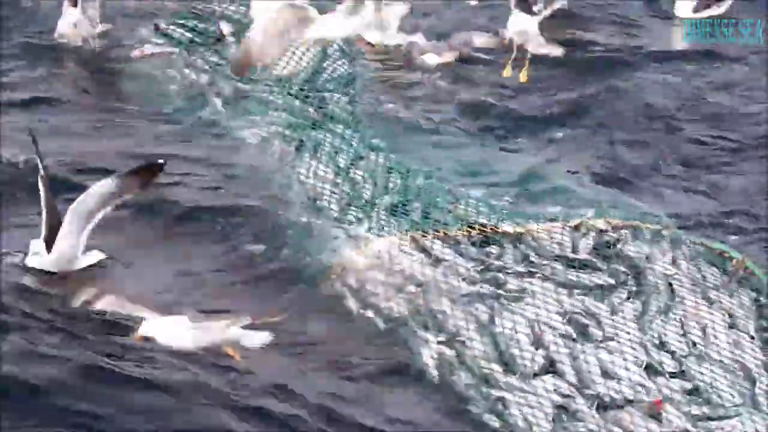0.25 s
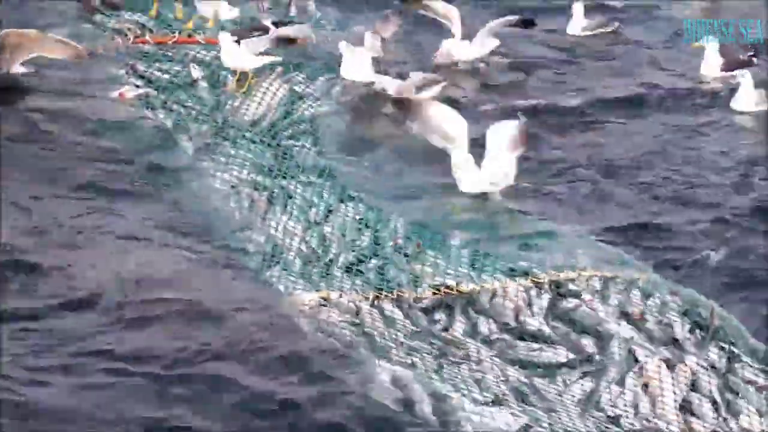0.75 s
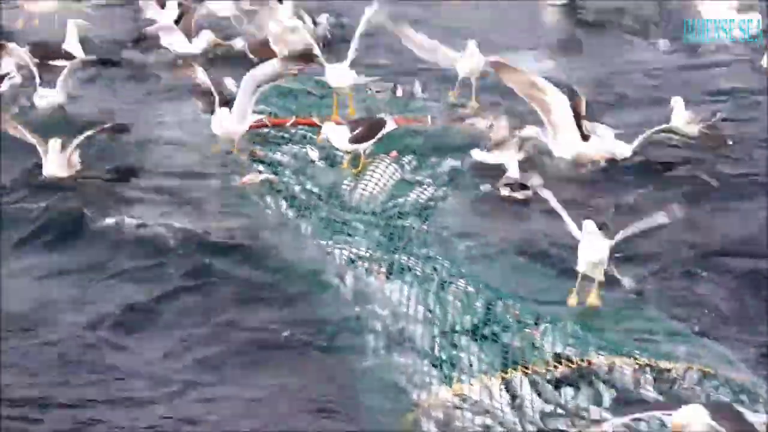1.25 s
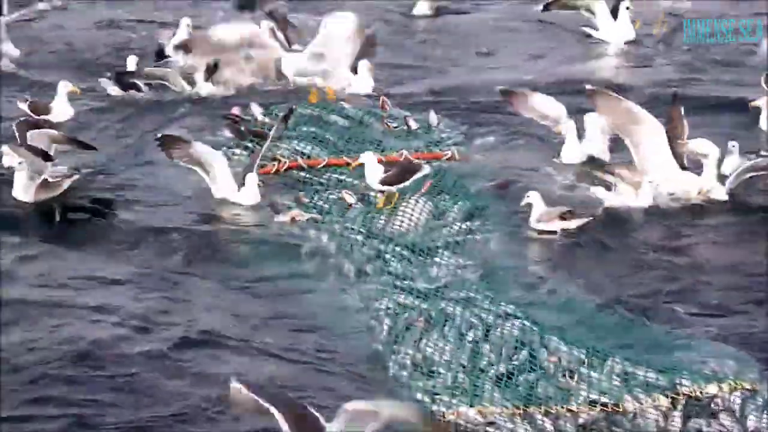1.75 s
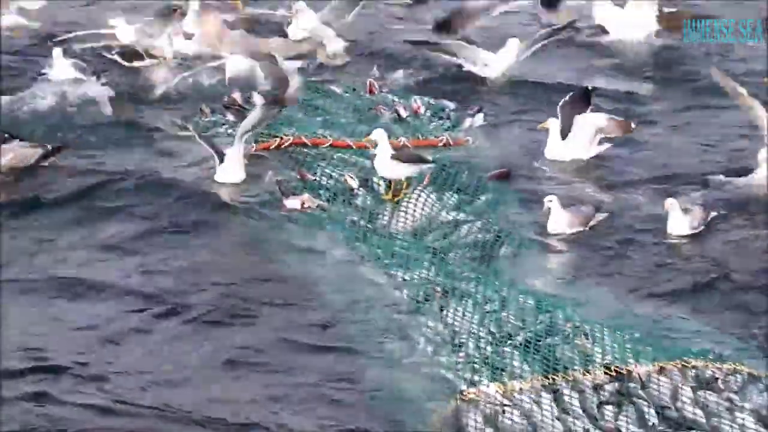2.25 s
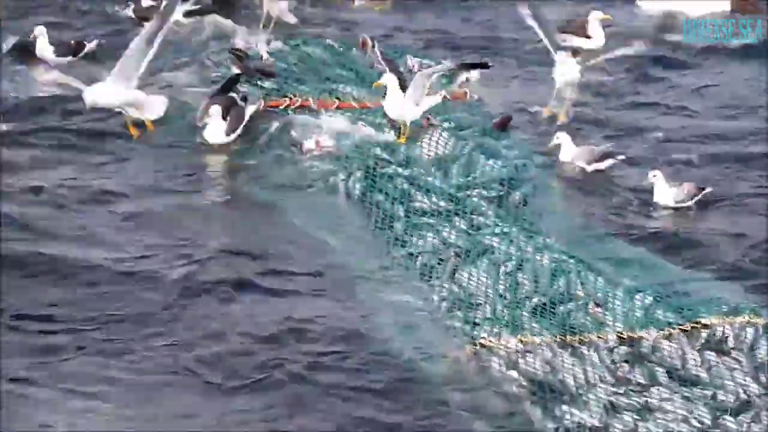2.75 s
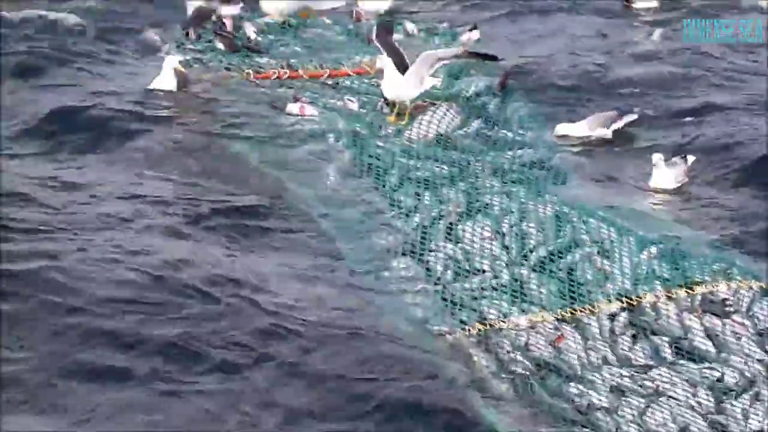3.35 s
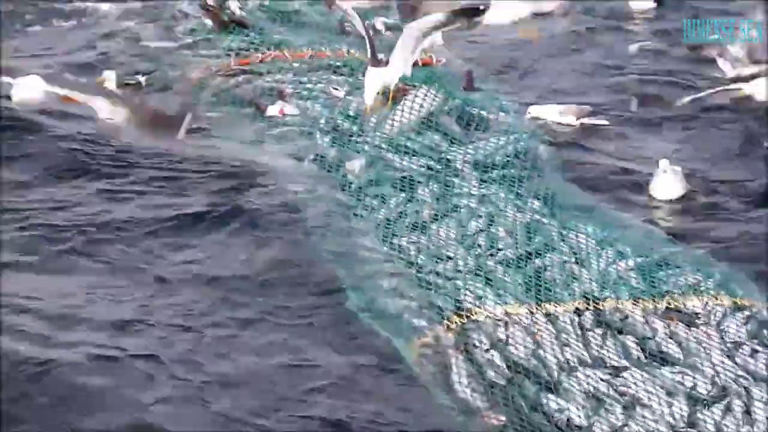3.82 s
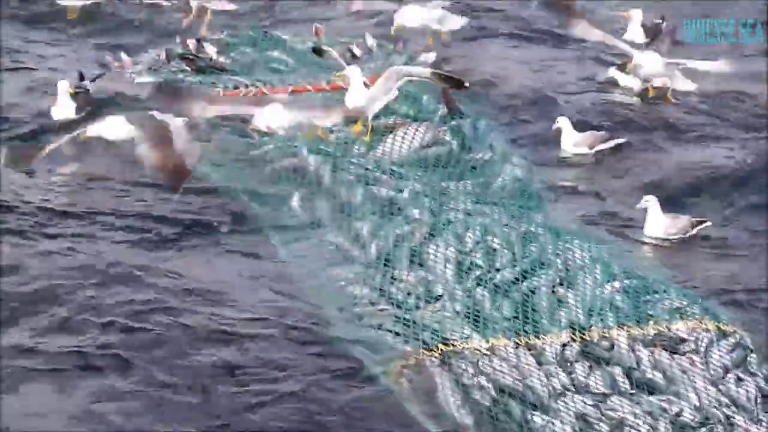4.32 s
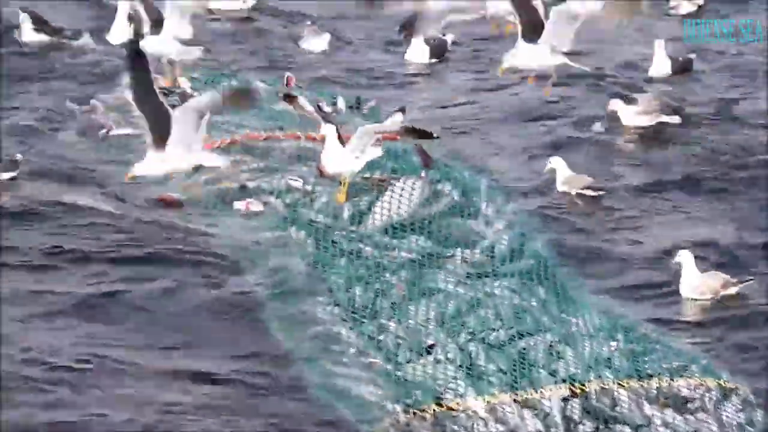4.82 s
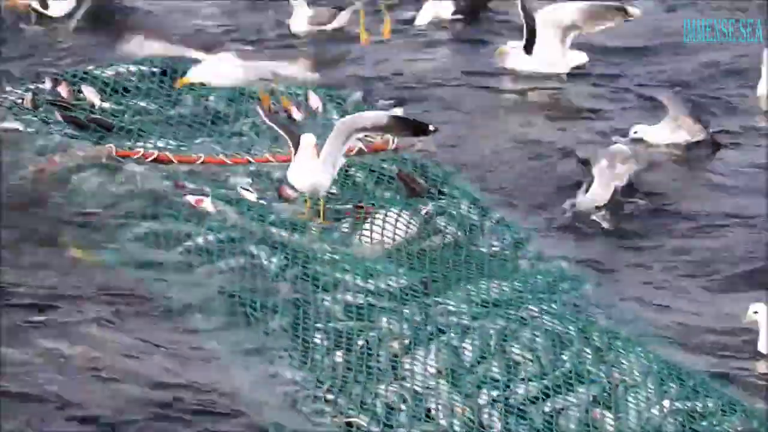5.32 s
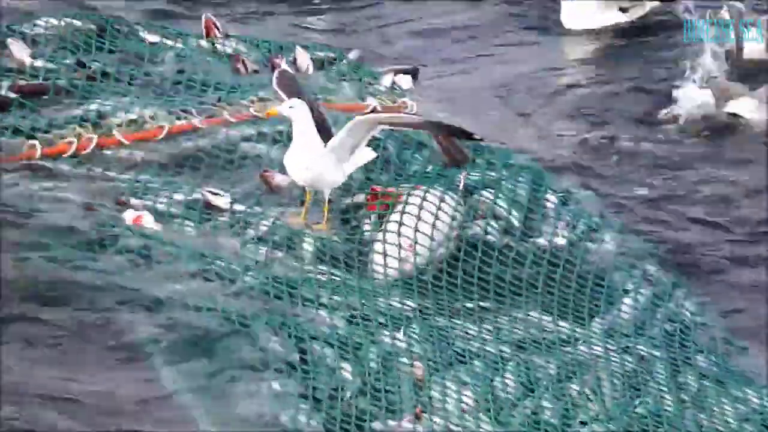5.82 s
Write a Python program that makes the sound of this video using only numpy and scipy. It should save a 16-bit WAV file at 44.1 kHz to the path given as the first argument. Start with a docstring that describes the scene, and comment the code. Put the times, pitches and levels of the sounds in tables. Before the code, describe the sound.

Gulls swarm around a full net, squawking in quick overlapping bursts, some shrill and some hoarse. The distant flock is loudest at the opening and thins gradually, while near yelps grow dense from two seconds on. Metal gear knocks and rattles in the first second and a half, with the background briefly ducking around the blows. Sea wash and a wavering engine drone stay low underneath, in open air, through a dull microphone.

```python
"""A far flock of gulls babbles beside a trawler, heard by a small, dull microphone on deck. Short yelps from
near birds, gliding harmonic stacks, cut through 1200 blurred, buzzing far cries and hiss. Sea wash is coloured
noise and the engine hums in wavering sine lines. Struck deck gear crunches in noise bursts and rings in
decaying sines; later a lone short bright click sounds; flock, sea and engine dip at set times."""
import sys
import numpy as np
from scipy import signal
from scipy.fft import rfft, irfft, next_fast_len
from scipy.io import wavfile
from scipy.ndimage import uniform_filter1d

SR = 44100
rng = np.random.default_rng(int(sys.argv[2]) if len(sys.argv) > 2 else 0)


def dump_mix(stems):
    """Bounce the given channels to the path in sys.argv[1] as a 16-bit WAV at rate SR."""
    frames = np.atleast_2d(stems).T  # one column per channel
    limited = np.clip(frames, -1, 1)  # hard clip at full scale
    pcm = np.round(limited * 32767).astype(np.int16)
    wavfile.write(sys.argv[1], SR, pcm)


N = 268039  # length in samples


def gain_of(db):
    """Amplitude factor for a level in dB."""
    return 10 ** (np.asarray(db) / 20)


def evened(x):
    """Scales x to an rms of 1."""
    return x / np.sqrt(np.mean(x ** 2) + 1e-20)


def read(points, hz):
    """Reads a (Hz, dB) curve on a logarithmic frequency axis."""
    f, value = np.transpose(points)
    return np.interp(np.log(hz + 1), np.log(f + 1), value)


def coloured(x, db_of):
    """Filters x by a gain in dB given as a function of frequency."""
    size = next_fast_len(x.shape[-1])
    gain = gain_of(db_of(np.fft.rfftfreq(size, 1 / SR)))
    return irfft(rfft(x, size) * gain, size)[..., :x.shape[-1]]


def add(mix, s, sound):
    """Lays a sound into the mix from s seconds on."""
    part = mix[max(round(s * SR), 0):][:len(sound)]
    part += sound[:len(part)]


def wander(size, span):
    """Smooth random drift of rms 1: noise averaged twice over a span in samples."""
    once = uniform_filter1d(rng.standard_normal(size), int(span))
    return evened(uniform_filter1d(once, int(span)))


def fading_noise(seconds, t60):
    """Unit-energy noise tail that falls 60 dB in t60 seconds."""
    t = np.arange(round(seconds * SR)) / SR
    tail = rng.standard_normal(len(t)) * gain_of(-60 * t / t60)
    return tail / np.linalg.norm(tail)


# Dips of the steady sounds, the first already under way at the opening.
# Each row: start in seconds, depth in dB.
DIPS = [(-.15, 5), (0.399, 9), (1.24, 15)]
DIP_S, REGAIN_DB_PER_S = 0.23, 20.5  # time to full depth, then rate of return


def level(curve):
    """Gain over time: a level curve in dB, lowered by the deepest dip of the moment."""
    t = np.arange(N) / SR
    dips_db = []
    for s, depth in DIPS:
        sinking = depth * (t - s) / DIP_S
        regaining = depth - REGAIN_DB_PER_S * (t - s - DIP_S)
        dips_db.append(np.minimum(sinking, regaining))
    return gain_of(np.interp(t, *np.transpose(curve)) - np.maximum(np.max(dips_db, 0), 0))


# Sea wash and hull rumble, by spectrum shape. Each row: frequency in Hz, relative density in dB per Hz.
WASH = [(25, -47), (54, -43), (100, -47), (144, -26), (205, -24.5), (279, -11.5), (419, -9.5), (600, -10.5),
        (1000, -6), (1500, -7.5), (2600, -59)]
# Engine lines. Each row: frequency in Hz, level in dB relative to the ABOARD curve.
HUM = [(89.6, -31.5), (179.3, -19), (255, -32.5), (276, -15.5), (358, -15.5), (485.5, -10.5),
       (613.5, -13.5)]
# Sea and engine over time. Each row: time in seconds, reference level in dB before the dips.
ABOARD = [(0, -42.5), (1.2, -39), (2.3, -41), (3.75, -39.5), (3.95, -42.5), (4.4, -38.5), (4.65, -43),
          (5.1, -42), (5.6, -43.5), (6.08, -40.5)]


def boat():
    """Sea wash is coloured noise; the engine is sine lines that waver more the higher they lie."""
    wash = evened(coloured(rng.standard_normal(N), lambda f: read(WASH, f)))
    t = np.arange(N) / SR
    hum = np.zeros(N)
    for hz, db in HUM:
        strength = gain_of(db + hz / 170 * wander(N, 2500))
        phase = 2 * np.pi * hz * t + hz / 350 * wander(N, 2500)
        hum += strength * np.sin(phase)
    return (gain_of(4.0) * wash + np.sqrt(2) * hum) * level(ABOARD)


HIGHEST_HZ = 14700  # no overtone starts above this, and the microphone stops here
RISE_BEND = 0.82  # below 1, a cry reaches full effort early and tails off
SWELL_FIRST, SWELL_OVERTONES = 0.25, 1.2  # powers of effort: the higher, the narrower the swell


def cry(length, pitches, harmonics_db, jitter, rasp, size):
    """A harmonic stack on a bent glide: the pitch trembles, each harmonic rasps, overtones swell later."""
    u = np.linspace(-1, 1, round(length * SR))
    k = np.arange(1, len(harmonics_db) + 1)[:, None]
    shake = wander(10 * size, 50)[:len(u)]
    grain = np.repeat(wander((len(k), size), 14), 10, 1)[:, :len(u)]  # each value held for 10 samples
    start, middle, end = pitches
    hz = middle + (end - start) / 2 * u + ((start + end) / 2 - middle) * u ** 2
    turns = np.cumsum(hz * (1 + jitter * shake)) / SR
    heard = gain_of(harmonics_db)[:, None] * (k * middle < HIGHEST_HZ)
    heard = heard * (1 + rasp * grain) / np.hypot(1, rasp)
    effort = np.clip(np.sin(np.pi * ((u + 1) / 2) ** RISE_BEND), 0, 1)
    heard = heard * effort ** np.where(k > 1, SWELL_OVERTONES, SWELL_FIRST)
    waves = np.sin(2 * np.pi * (k * turns + rng.random(k.shape)))
    return np.sqrt(2) * (heard * waves).sum(0) * (1 - 0.09 * u)


# Colour of the distant flock. Each row: frequency in Hz, gain in dB.
FLOCK = [(60, -70), (250, -44), (450, -23), (800, -11.5), (1100, -8), (1600, -3), (2050, 1.5), (2600, -0.5),
         (3200, -3.5), (4200, 0), (5200, -10), (7000, -9), (14000, -8)]
# Far birds. Each row: central pitch in Hz, relative share of the cries.
VOICES = [(760, 6), (1020, 3), (1230, 2), (1480, 10), (1650, 8), (2120, 7)]
# Far flock over time. Each row: time in seconds, level in dB before a 2 dB lift and the dips.
CLAMOUR = [(0, -18), (.27, -29.5), (.42, -22.5), (.55, -25.5), (.7, -18.5), (.97, -31), (1.15, -26.5),
           (1.3, -23), (1.5, -27.5), (1.7, -23), (2.08, -28.5), (2.2, -24.5), (2.8, -27), (3.5, -26.5),
           (3.6, -32), (3.7, -24), (4, -25.5), (4.12, -29), (4.3, -31), (4.4, -23.5), (4.6, -27),
           (4.7, -31.5), (4.9, -28.5), (5.27, -37), (5.5, -30.5), (5.65, -31), (5.78, -36.5), (5.9, -30.5),
           (6.08, -36.5)]
FLOCK_CRIES = 1200
FAR_TREMBLE, FAR_RASP = .003, .36  # share of the pitch, share of the level
BUZZ_HZ, BUZZ = (70, 260), .4  # far throats pulse: range of rates, depth


def far_flock():
    """Overlapping cries with pulsing loudness, blurred into the hiss of wings and spray."""
    hz, share = np.transpose(VOICES)
    edges = np.cumsum(share) / share.sum()
    out = np.zeros(N)
    draws = rng.random((FLOCK_CRIES, 7))
    colours = rng.standard_normal((FLOCK_CRIES, 7))
    draws[:, 0] = (np.arange(FLOCK_CRIES) + draws[:, 0]) / FLOCK_CRIES  # the cries come at an even pace
    for (at, voice, bend, fall, length, size, rate), colour in zip(draws, colours):
        bird = min(np.searchsorted(edges, voice), len(hz) - 1)
        pitch = hz[bird] * (1 + 0.28 * (bend - .5))
        glide = pitch * (1 + 0.029 * (fall - .3) * np.array([1.3, 0, -1]))
        harmonics_db = 3 * size + 2.2 * colour
        sound = cry(0.022 + 0.04 * length, glide, harmonics_db, FAR_TREMBLE, FAR_RASP, size=450)
        buzz_hz = np.interp(rate, (0, 1), BUZZ_HZ)
        buzz = np.cos(2 * np.pi * buzz_hz * np.arange(len(sound)) / SR)
        add(out, at * N / SR, sound * (1 + BUZZ * buzz))
    hiss = rng.standard_normal(N) * gain_of(1.5 * wander(N, 500))
    babble = evened(out) + gain_of(-1.5) * hiss
    return evened(coloured(babble, lambda f: read(FLOCK, f))) * level(CLAMOUR) * gain_of(2.0)


# Blows on the deck gear; the last row is not a blow but a lone short bright click, made the same way. Each row:
# start in seconds, crunch reference in dB (rattle 4.5 below, crack 6 above), rattle hold in seconds, its added
# treble above 6 kHz in dB, ring offset in dB below 3 kHz, from 3 to 6 kHz, above 6 kHz, free ringing in
# seconds.
BLOWS = [(0.439, -15, .002, -2, -50, -44, -47, 0.068), (0.448, -19, 0.0027, -7, -21.5, -50, -22, 0.1),
         (1.2376, -23.5, 0.006, -33, -25.5, -48, -48, 0.12), (1.242, -22, .012, -2, -25, -47, -47, 0.15),
         (1.321, -14.5, 0.0045, -12, -43, -29, -33, 0.085), (1.328, -17, .012, 2, -42, -47, -43, 0.081),
         (1.337, -15.5, 0.027, 2, -41, -24, -24, 0.12), (1.885, -29.5, 0.002, -20, -28.5, -53, -63, 0.014),
         (3.84, -24, .001, 11, -50, -50, -50, .01)]
# Ringing modes of the steel. Each row: frequency in Hz, level in dB before the blow's offset,
# time to fall 60 dB in seconds while ringing freely.
GEAR = [(900, -10, .3), (974, -8, .4), (2400, -8, .08), (2633, 0, .9), (2890, -4, .15), (3531, 0, .2),
        (4300, 1, .1), (4480, 2, .1), (5334, 6, .15), (7353, -2, .3), (9683, 6, .27), (13600, 6, .12),
        (13940, 6, .16)]
# Colour of the crunch. Each row: frequency in Hz, relative density in dB per Hz.
CRUNCH = [(100, -59), (400, -21), (950, -11), (1500, -8), (3500, 6.5), (5000, -3.5), (8000, 10),
          (14000, -1.5), (16000, -40)]
CUT_SHORT_T60_S = .05  # extra decay once the free ringing is over


def gear():
    """Each blow is a rattling crunch; the steel rings unevenly and the ringing is soon cut short."""
    out, t = np.zeros(N), np.arange(SR // 5) / SR
    hz, db, t60 = np.transpose(GEAR)[:, :, None]
    for s, crunch_db, length, treble_db, low_db, mid_db, high_db, free in BLOWS:
        uneven = gain_of(2.2 * wander((len(GEAR), len(t)), 200))
        struck_db = db + np.select([hz < 3000, hz < 6000], [low_db, mid_db], high_db)
        cut_db = 60 * np.maximum(t - free, 0) / CUT_SHORT_T60_S
        ring = gain_of(struck_db - 60 * t / t60 - cut_db) * np.sin(2 * np.pi * hz * t)
        noise = rng.standard_normal(len(t))
        grit = evened(coloured(noise, lambda f: read(CRUNCH, f) + treble_db * (f > 6000)))
        rattle_fall_db = 60 * np.maximum(t - length, 0) / 0.12
        rattle = gain_of(crunch_db - 4.5 - rattle_fall_db + 0.88 * wander(len(t), 50))
        crack = gain_of(crunch_db + 6 - 60 * t / .012)  # the first sharp crack
        onset = np.minimum(t / .001, 1) ** 2
        add(out, s, ((ring * uneven).sum(0) + (rattle + crack) * grit) * onset)
    return out


# Near cries. Each row: start of the held part in seconds, its length in seconds, mid-cry pitch in Hz,
# fall from start to end in Hz (negative rises), fundamental level in dB,
# number of the strongest overtone, its level in dB.
CRIES = [(.003, 0.0048, 735, 15, -57, 3, -23), (0.02, 0.088, 2240, 33, -45, 2, -36),
         (0.471, 0.022, 1483, 10, -58, 2, -28), (0.062, 0.042, 756, -14, -61, 5, -31),
         (0.129, 0.057, 1940, 67, -38, 2, -49), (0.225, 0.024, 1630, -40, -36, 2, -42),
         (0.284, 0.02, 1896, -2, -37.5, 2, -32), (0.289, 0.032, 2300, 9, -35, 2, -34),
         (.405, 0.026, 2080, 22, -34, 2, -40), (0.432, 0.0083, 2320, -2, -24, 2, -32),
         (0.305, 0.056, 2060, -40, -31, 2, -53), (0.669, 0.033, 720, -2, -61, 5, -32.5),
         (0.723, 0.012, 2180, -25, -37, 2, -45), (0.782, 0.054, 1440, -13, -48, 2, -31),
         (0.85, 0.019, 2180, 34, -46, 2, -32.5), (0.95, 0.14, 1397, 17, -60, 3, -35.5),
         (0.92, 0.23, 1392, 27, -60, 2, -36.5), (1.011, 0.047, 1700, 34, -49, 2, -35),
         (1.007, 0.089, 1030, 40, -39, 2, -46), (1.127, 0.083, 1820, 223, -32, 2, -35),
         (1.273, 0.056, 1912, -1, -32.5, 2, -32.5), (1.588, 0.08, 1437, 3, -67, 2, -33.5),
         (1.589, 0.047, 1813, 147, -44, 2, -55), (1.704, 0.016, 2380, 31, -52, 2, -35),
         (1.887, 0.012, 904, 8, -52, 3, -35), (1.98, 0.058, 2330, 45, -41, 2, -35.5),
         (2.002, 0.02, 1556, 54, -42, 3, -30), (2.164, 0.018, 1042, 32, -33, 2, -33),
         (2.19, 0.057, 1296, -18, -56, 2, -27.5), (2.259, 0.019, 2285, 116, -29.5, 2, -25.5),
         (2.326, 0.038, 1476, 8, -36, 2, -24), (2.376, 0.02, 1427, 23, -53, 2, -29),
         (2.367, 0.039, 856, 4, -41, 3, -29), (2.469, 0.038, 2092, 43, -34, 2, -26.5),
         (2.524, 0.04, 2270, 158, -49, 2, -28), (2.607, 0.0029, 2320, 46, -24.5, 2, -34),
         (2.622, 0.043, 1023, -2, -38.5, 4, -30), (2.682, 0.16, 1760, -12, -37.5, 2, -34.5),
         (2.728, 0.052, 2118, 150, -27, 2, -27), (2.775, 0.05, 1640, 203, -50, 2, -35),
         (2.76, 0.015, 1595, 10, -28.5, 3, -30), (2.785, 0.033, 2180, 123, -48, 2, -26),
         (2.802, 0.054, 1567, 99, -31, 3, -22), (2.859, 0.069, 2013, 11, -36, 2, -33),
         (2.935, 0.032, 1087, 86, -32.5, 2, -50), (2.996, 0.036, 2230, 93, -53, 2, -30),
         (2.997, 0.046, 1461, 47, -33, 2, -27), (3.065, 0.0094, 1418, 12, -43, 2, -24),
         (3.098, 0.061, 2083, 45, -38, 2, -35), (3.155, 0.055, 2220, 152, -32, 2, -36),
         (3.175, 0.034, 1016, -12, -35, 4, -26.5), (3.198, .021, 1590, -13, -50, 3, -32),
         (3.258, 0.0045, 2074, 18, -51, 2, -24.5), (3.29, 0.033, 1573, 168, -33, 3, -23),
         (3.364, 0.042, 1386, -7, -47, 2, -29.5), (3.373, 0.044, 1595, 18, -37, 3, -48),
         (3.437, 0.02, 2160, 104, -29.5, 2, -26), (3.49, 0.0096, 1605, 20, -30.5, 3, -39),
         (3.537, 0.016, 2070, 54, -35, 2, -30), (3.627, 0.01, 1844, 34, -26, 2, -34),
         (3.661, 0.017, 1456, 12, -31.5, 3, -28), (3.692, 0.068, 1041, 93, -28, 4, -30.5),
         (3.736, 0.017, 1650, 26, -35, 3, -35), (3.754, 0.021, 853, 38, -51, 5, -27),
         (3.79, 0.038, 1763, -85, -28, 2, -38), (3.808, 0.028, 1594, 36, -30, 3, -39),
         (3.812, 0.055, 2200, 42, -46, 2, -28), (3.819, 0.048, 1377, 21, -51, 2, -25),
         (3.937, .021, 2084, -51, -30, 2, -51), (3.959, 0.075, 971, 10, -33, 2, -33),
         (3.983, 0.028, 1543, -57, -31, 2, -37), (4.017, 0.011, 2160, 75, -46, 2, -24),
         (4.066, 0.024, 2084, 192, -49, 2, -36), (4.169, 0.016, 1885, 109, -25.5, 2, -28.5),
         (4.186, 0.042, 736, 16, -50, 6, -23.5), (4.255, 0.034, 870, 56, -57, 5, -29),
         (4.26, 0.095, 936, 83, -31.5, 2, -34.5), (4.29, 0.048, 1715, 26, -54, 2, -35),
         (4.382, 0.044, 1688, -14, -31.5, 3, -36), (4.383, 0.077, 2153, 159, -39, 2, -27.5),
         (4.445, 0.011, 2130, -62, -29, 2, -33), (4.452, 0.048, 1666, 84, -27.5, 2, -28),
         (4.499, 0.03, 1170, 25, -28.5, 2, -36), (4.521, 0.035, 1776, -86, -21.5, 2, -34),
         (4.56, 0.043, 1854, 29, -36, 2, -29), (4.565, 0.061, 1524, 187, -27.5, 3, -23.5),
         (4.578, 0.11, 950, 31, -36.5, 2, -50), (4.617, 0.05, 2133, 42, -37, 2, -55),
         (4.637, 0.048, 2180, 78, -59, 2, -28), (4.806, 0.061, 1940, 48, -30, 2, -45),
         (4.833, 0.041, 2176, 163, -42, 2, -25), (4.834, 0.054, 1470, 169, -35, 3, -29),
         (4.94, 0.014, 2090, 56, -31, 2, -46), (4.96, 0.04, 1640, 117, -30, 3, -31),
         (4.999, 0.087, 1450, 76, -35, 3, -58), (5.048, 0.045, 1610, 62, -44, 3, -52),
         (5.081, 0.036, 1467, 101, -33.5, 3, -30.5), (5.117, 0.024, 1720, -10, -35.5, 2, -58),
         (5.143, 0.051, 1560, 170, -34.5, 3, -33.5), (5.179, 0.038, 1905, -18, -34, 2, -37),
         (5.271, 0.049, 1705, 78, -38.5, 2, -63), (5.296, 0.07, 2063, -26, -39, 2, -54),
         (5.334, 0.053, 1546, 196, -30.5, 3, -31.5), (5.352, 0.034, 2330, 74, -33.5, 2, -42),
         (5.408, 0.14, 1212, 11, -48, 3, -41), (5.446, 0.071, 2100, 25, -60, 2, -41),
         (5.499, 0.023, 940, 25, -33.5, 3, -37), (5.5, 0.022, 1730, 21, -32, 2, -58),
         (5.52, 0.047, 1544, 139, -31.5, 3, -35.5), (5.578, 0.042, 1640, 58, -34, 2, -57),
         (5.627, 0.1, 1525, 141, -37.5, 3, -46), (5.6, 0.025, 2150, 90, -32, 2, -48),
         (5.634, 0.037, 2020, 67, -33, 2, -46), (5.687, 0.047, 1790, -1, -45, 2, -38),
         (5.708, 0.052, 1172, 5, -63, 4, -43), (5.711, 0.045, 1570, 70, -46, 3, -39),
         (5.716, 0.017, 2065, 80, -38, 2, -38), (5.785, 0.068, 1696, -71, -38.5, 2, -38),
         (5.829, 0.027, 2270, -120, -36, 2, -54), (5.847, 0.037, 1020, 4, -38, 2, -50),
         (5.866, 0.067, 1654, 40, -34, 2, -50), (5.871, 0.04, 1445, -12, -36, 3, -44),
         (5.905, 0.039, 1540, 118, -30, 3, -33.5), (5.949, 0.051, 2036, 17, -31.5, 2, -44),
         (5.987, 0.042, 1590, -40, -37.5, 2, -58)]
EDGES_S = .007  # added before and after the held part of a cry
EARLY_FALL = 0.568  # share of the fall done by the middle of a cry
TREMBLE, RASP = .0015, .26  # share of the pitch, share of the level
# overtones next to the strongest drop by a step, then fade per overtone below it and regain a little above it
STEP_BELOW_DB, FADE_BELOW_DB = -6, -1.5
STEP_ABOVE_DB, REGAIN_ABOVE_DB = -14, 0.57
SHRILL, SHRILL_FROM_DB = 0.34, -25.5  # louder cries, stronger top overtones: dB per dB, from this level


def near_gulls():
    """Each cry, a fundamental under overtones that peak at one; hull and waves scatter it back."""
    out, k = np.zeros(N), np.arange(1, 16)
    for s, length, hz, fall, first_db, strongest, strongest_db in CRIES:
        away = k - np.round(strongest)
        below_db = STEP_BELOW_DB - FADE_BELOW_DB * away
        shrill_db = SHRILL * (strongest_db - SHRILL_FROM_DB)
        above_db = STEP_ABOVE_DB + REGAIN_ABOVE_DB * away + shrill_db
        drop_db = np.where(away < 0, below_db, above_db) * (away != 0)
        stack_db = np.where(k == 1, first_db, strongest_db + drop_db)
        glide = (hz + EARLY_FALL * fall, hz, hz - (1 - EARLY_FALL) * fall)
        sound = cry(length + 2 * EDGES_S, glide, stack_db, TREMBLE, RASP, size=1100)
        add(out, s - EDGES_S, sound)
    scattered = signal.oaconvolve(out, fading_noise(0.2, t60=0.3))[:N]
    return out + gain_of(-19.0) * scattered


# Left-right difference. Each row: frequency in Hz, gain in dB of the smeared copy.
SIDES = [(30, -12), (70, -22), (150, -19.5), (1000, -23.5), (2500, -21.5), (5600, -13), (12000, 1)]


def scene():
    """Nearly mono: a smeared copy, added left and subtracted right, tells the two sides apart."""
    mid = boat() + far_flock() + gear() + near_gulls()
    smeared = signal.oaconvolve(mid, fading_noise(0.1, t60=0.1))[:N]
    side = coloured(smeared, lambda f: read(SIDES, f))
    return mid * gain_of([[.25], [-.25]]) + side * np.array([[1], [-1]])


# Microphone response. Each row: frequency in Hz, gain in dB.
MIC = [(25, -10), (75, -0.5), (4900, -0.5), (5150, -3.5), (5500, -10.5), (6050, -19), (6900, -32.5),
       (10500, -37), (12500, -73), (13600, -51), (14500, -71)]
# Narrow gaps in the sound. Each row: start in seconds (-1 is throughout), centre in Hz, width in Hz.
GAPS = [(-1, 266, 12), (-1, 1314, 150), (4.93, 883, 120), (4.93, 1072, 100), (4.93, 1925, 130)]
OVERLOAD, SQUASH = 0.2, 0.13  # peak height, share lost of the excess (its part above 500 Hz)


def record(dry):
    """Dull microphone, narrow gaps, slight overload, treble hiss that grows with loudness, band limit."""
    x = coloured(dry, lambda f: read(MIC, f))
    for s, hz, width in GAPS:
        cut = signal.lfilter(*signal.iirnotch(hz, hz / width, SR), x)
        x = x + (cut - x) * np.clip((np.arange(N) / SR - s) / .02, 0, 1)
    excess = np.sign(x) * np.maximum(abs(x) - OVERLOAD, 0)
    x = x - SQUASH * signal.sosfilt(signal.butter(4, 500, "high", fs=SR, output="sos"), excess)
    treble = signal.butter(4, [6200, 12200], "band", fs=SR, output="sos")
    loudness = uniform_filter1d((x ** 2).mean(0), 900) ** 0.86  # from power averaged over 900 samples
    left, right, both = signal.sosfilt(treble, rng.standard_normal((3, N)))
    hiss = np.array([left, right]) + both
    x = x + hiss * (gain_of(-39) * loudness + gain_of(-26) * level(ABOARD))
    band_limit = signal.firwin(511, HIGHEST_HZ, window=("kaiser", 9), fs=SR)
    return signal.oaconvolve(x, band_limit[None], "same")


dry = scene()
out = record(dry)
dump_mix(out)
```